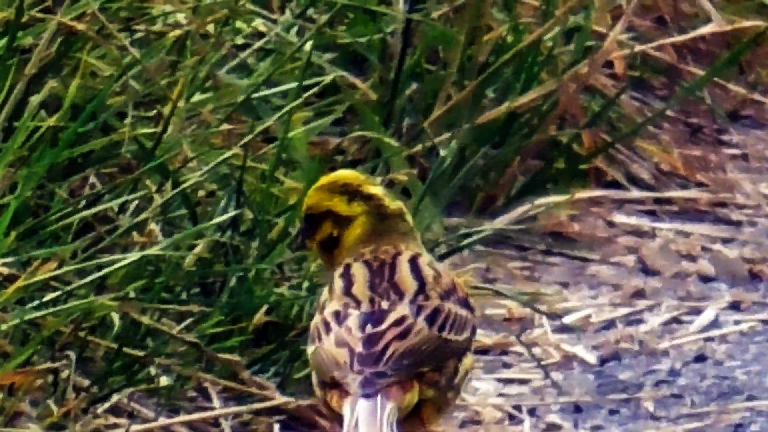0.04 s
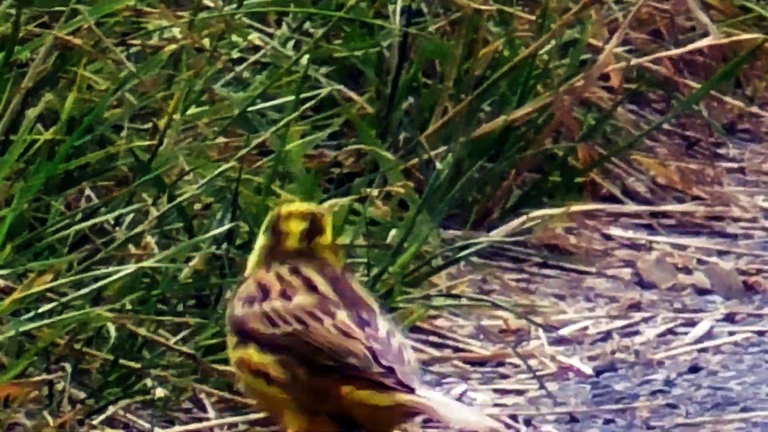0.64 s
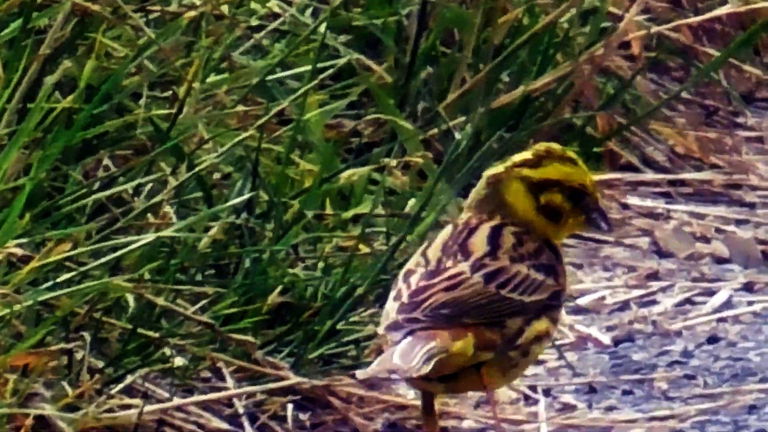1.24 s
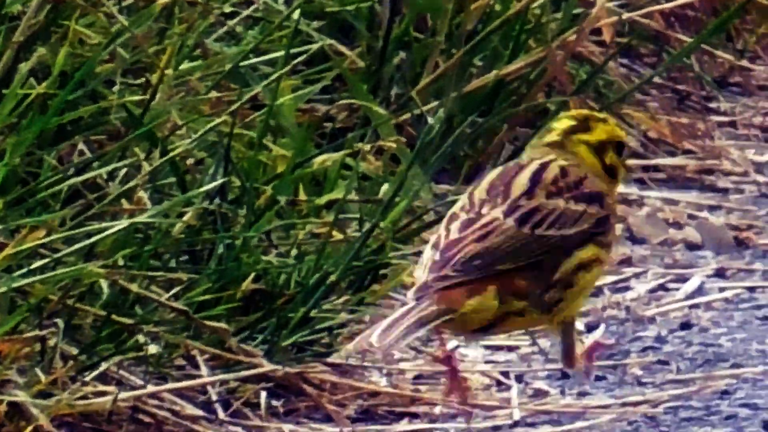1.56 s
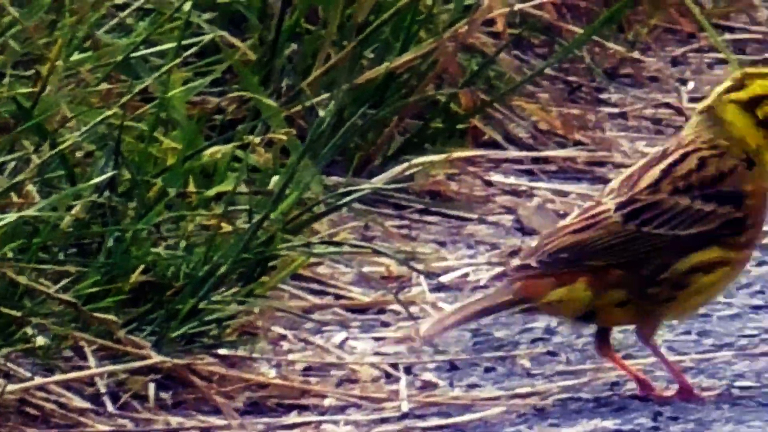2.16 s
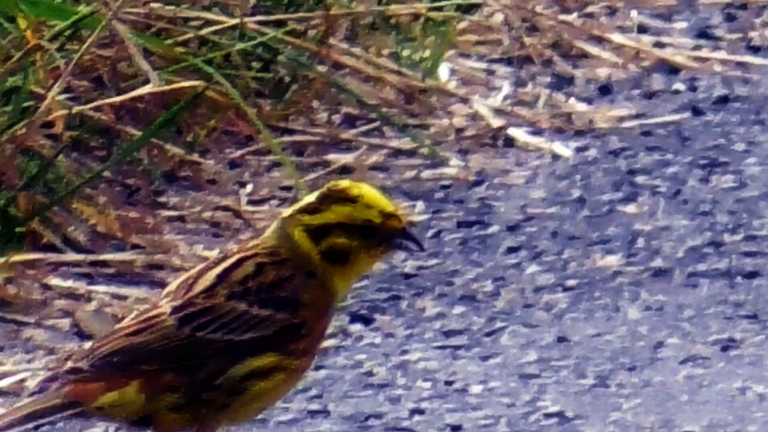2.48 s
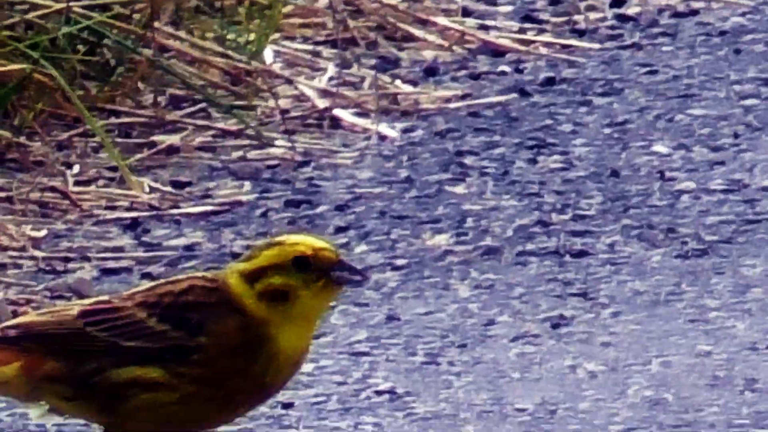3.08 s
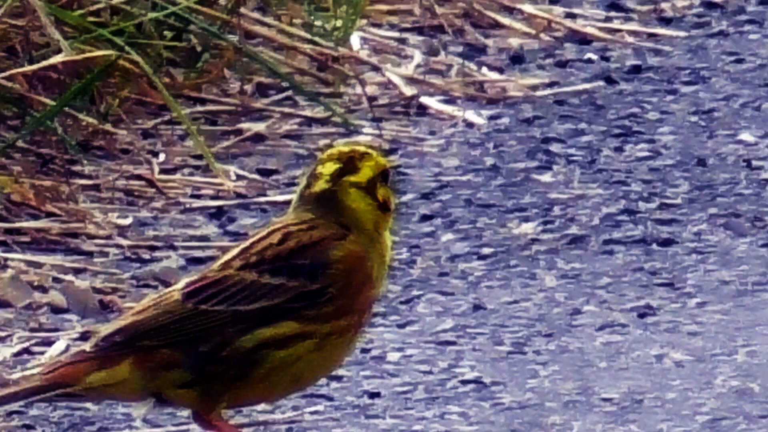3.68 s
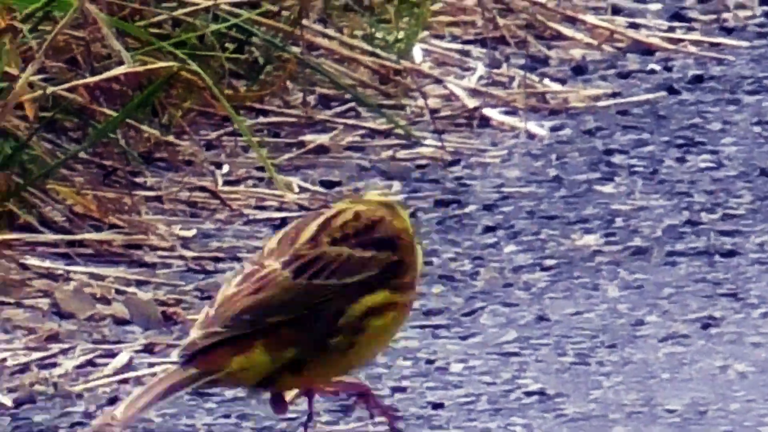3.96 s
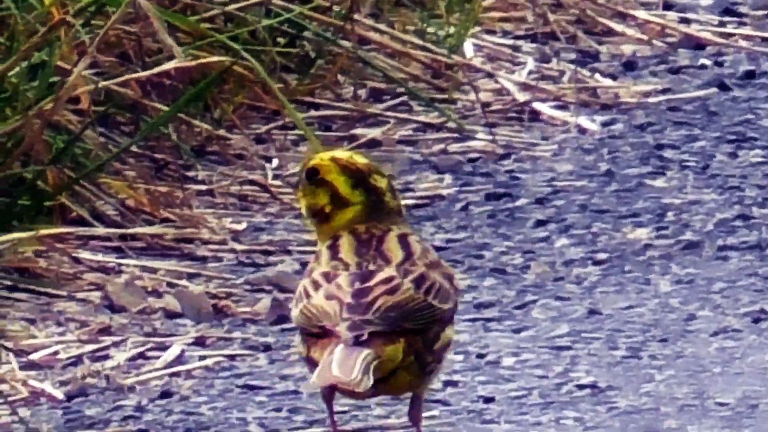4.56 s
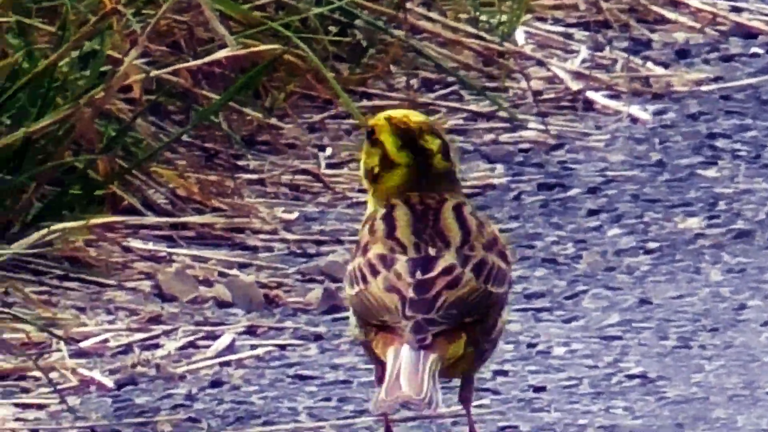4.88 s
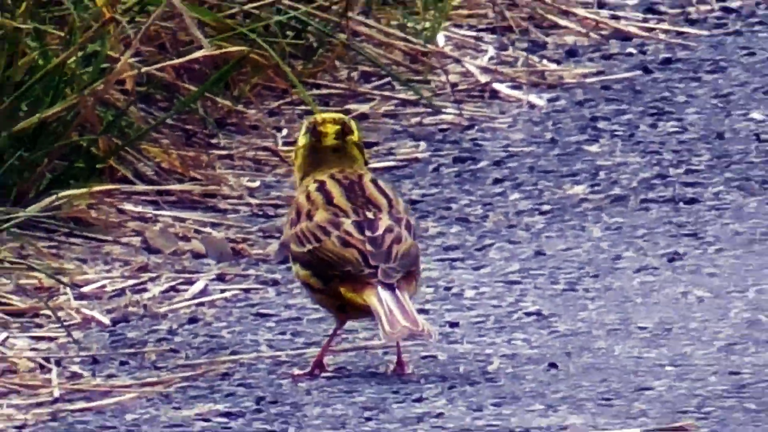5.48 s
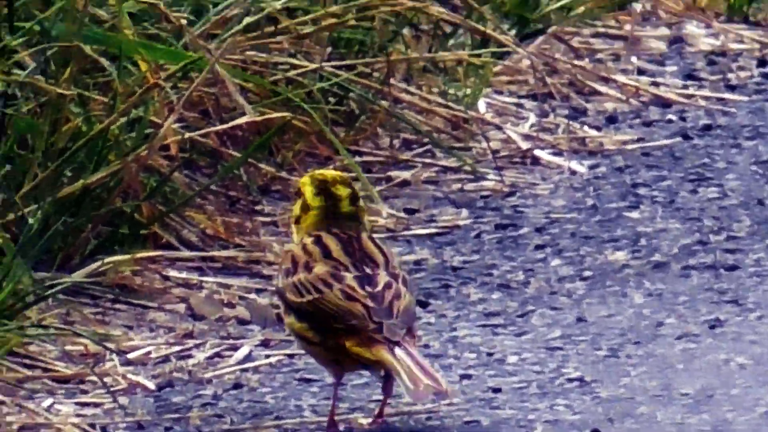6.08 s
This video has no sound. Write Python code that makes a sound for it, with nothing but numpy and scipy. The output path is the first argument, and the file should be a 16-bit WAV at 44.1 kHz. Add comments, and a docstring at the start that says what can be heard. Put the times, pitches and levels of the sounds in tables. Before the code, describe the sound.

A low outdoor rumble and the soft hiss of a distant bird chorus run throughout, about six seconds at a rural roadside. Faint far chirps come first. At 0.7 seconds a nearby songbird starts with a few soft notes, then sings loudly: a high falling slur at 1.2, quick repeated chips from 1.5 to 1.9, then a rising note, a sharp downward sweep and short whistles. Five evenly spaced rising sweeps follow from 2.5 to 3.2. Two lower whistles lead to a steep plunge at 3.5, three falling notes, a thin high whistle at 4.2 and another downward sweep. A fast dry rattle ends the song from 4.5 to 5. The notes are clear and high, each with a short fading echo. Other birds chatter quietly behind the song and keep calling until about 6 seconds. A few faint ticks and soft blips are scattered through.

```python
"""Songbird beside a country road

A songbird sings one loud phrase of slurs, sweeps and repeated notes and ends in a dry rattle.
Each note is a nearly pure tone that slides in pitch, and trees scatter it into a fading tail.
Other birds call further off, with a few faint ticks and soft blips in between. Under it all
lie a low outdoor rumble and the hiss of a distant chorus, both made of shaped noise."""
import sys
import numpy as np
from scipy import signal
from scipy.fft import rfft, irfft
from scipy.io import wavfile
from scipy.ndimage import uniform_filter1d, minimum_filter1d

SR = 44100
rng = np.random.default_rng(int(sys.argv[2]) if len(sys.argv) > 2 else 0)


def materialize(psi):
    """Save the field psi as 16-bit PCM at rate SR to the path in sys.argv[1].

    A 1-D psi becomes a single channel; in a 2-D psi each row is a channel.
    """
    bounded = np.clip(np.atleast_2d(psi).T, -1, 1)
    quanta = np.round(bounded * 32767).astype(np.int16)
    wavfile.write(sys.argv[1], SR, quanta)


N = 279594
TIME = np.arange(N) / SR

# tone colour of the rumble and of the distant chorus: f/Hz, relative level/dB
RUMBLE_COLOUR = [(15, -44), (25, -17), (37, -11), (86, 1), (114, -5.5), (145, -7), (224, -12.5), (286, -12),
                 (328, -16), (358, -14), (917, -23.5), (1210, -30), (1600, -36), (2080, -56), (3520, -120)]
CHORUS_COLOUR = [(940, -46), (1600, -8.5), (1830, -4.5), (2220, -3), (2440, -3), (2870, -3.5), (3130, -6),
                 (3440, -2), (3900, 1), (4250, 2), (4960, -4), (5780, 2), (6930, 3.5), (8080, -6.5),
                 (15800, -16.5)]
# how each of them swells and ebbs: t/s, relative level/dB
RUMBLE_SWELL = [(0.0, -33), (0.23, -34), (2.05, -30), (2.86, -34), (4.27, -28), (5.54, -33), (6.29, -27),
                (6.34, -32)]
CHORUS_SWELL = [(0, -1.8), (4.9, -1.8), (5.55, -4), (6.34, -1.5)]
# balance of the background: f/Hz, left minus right level/dB
AIR_PAN = [(60, -14), (110, -8.5), (200, -8.5), (380, -4), (700, -3.0), (1290, -1), (2380, -1.5), (4400, 0),
           (8120, 1.5), (15000, -0.5)]
# how alike its two sides are: f/Hz, likeness (0 to 1)
AIR_LIKENESS = [(30, 0.69), (70, 1), (140, 0.86), (300, 0.61), (1100, 0.67), (2200, 0.49), (3800, 0.7),
                (6600, 0.91), (8000, 0.62), (11000, 0.14)]
# how far its left side runs ahead of the right: f/Hz, phase/rad
AIR_PHASE = [(30, 3.5), (70, 2), (300, 2.1), (600, 1.93), (1100, 1.7), (2200, 0.95), (4000, -0.46),
             (12000, 0)]

# note shapes by name: length/s, start f/Hz, end f/Hz, glide/s, fade-in/s, fade-out/s, level change/dB
SYLLABLES = { "slur": (.155, 9000, 6490, .097, .055, .022, -8),
             "chip": (.048, 7200, 5380, .026, .011, .008, -4),
             "tip": (.032, 5820, 4560, .046, .009, .01, -1), "pip": (.011, 5400, 6350, .012, .006, .004, 0),
             "rise": (.12, 6680, 7880, .105, .014, .02, -7),
             "chew": (.069, 6950, 3800, .064, .008, .014, -5),
             "chow": (.074, 6500, 3620, .075, .009, .016, -8),
             "whistle": (.055, 4930, 4785, .022, .021, .03, -2),
             "see": (.092, 6500, 6740, .04, .009, .015, 1), "drop": (.016, 6750, 5800, .026, .005, .005, 0),
             "sweep": (.098, 4660, 6200, .103, .016, .042, 9),
             "flute": (.092, 4200, 3975, .045, .025, .026, 0),
             "dip": (.066, 5150, 4550, .036, .02, .02, -1),
             "plunge": (.156, 8400, 5520, .055, .04, .02, -10),
             "tew": (.076, 5380, 3590, .103, .008, .011, -10),
             "thin": (.185, 7600, 7170, .38, .046, .025, -3),
             "sue": (.06, 7100, 6250, .075, .008, .014, -3), "wit": (.028, 3400, 4300, .04, .01, .008, 0),
             "arch": (.085, 7730, 8150, .055, .02, .015, 0),
             "lift": (.055, 4870, 5060, .055, .015, .012, -2),
             "click": (.0058, 7700, 4400, .008, .0022, .0025, 0),
             "flick": (.01, 5500, 7900, .016, .002, .006, -4), }
# some syllables slide into their start pitch first: length/s, from f/Hz
LEAD_INS = {"chip": (.01, 4600), "rise": (.015, 7200), "chew": (.011, 4400), "chow": (.011, 4200),
            "see": (.015, 7350), "plunge": (.024, 8050), "thin": (.028, 6750)}
# single notes of the far birds and of the near singer: t/s, syllable, level/dB, pitch ratio
NEIGHBOUR_NOTES = [ (.04, "flute", -41, 1.09), (.05, "flute", -46, .79), (.11, "flute", -41, 1.09),
                   (.562, "tip", -38, .98), (.96, "arch", -43, .9), (1, "tip", -42, .6),
                   (1.36, "wit", -33, 1), (1.65, "wit", -39, 1), (2.318, "tip", -37, .62),
                   (2.6, "flute", -39, .87), (2.74, "flute", -41, .775), (2.9, "flute", -37, .91),
                   (3.395, "sue", -34, 1.13), (3.455, "wit", -37, .87), (3.655, "lift", -40, .595),
                   (3.91, "sue", -40, .44), (4.315, "sue", -27, .98), (4.318, "sue", -40, .445),
                   (4.533, "sue", -27, 1), (4.756, "whistle", -33, .93), (5.205, "flute", -40, 1.05),
                   (5.28, "lift", -41, .84), (5.345, "lift", -43, .86), (5.792, "pip", -42, .37),
                   (5.82, "wit", -43, .98), (5.855, "lift", -43, .85)]
SONG_NOTES = [ (.746, "tip", -25, 1.015), (.892, "lift", -24, 1), (1.078, "lift", -30, .885),
              (1.156, "slur", -15.5, 1), (1.416, "chip", -15, .985), (1.907, "rise", -12.5, 1),
              (2.048, "chew", -10.5, 1), (2.226, "whistle", -13, 1), (2.38, "see", -16.5, 1),
              (2.468, "drop", -13.5, 1), (3.288, "flute", -17.5, 1), (3.435, "dip", -16, 1),
              (3.548, "plunge", -11, 1), (4.186, "thin", -14.5, 1), (4.411, "chow", -12, 1)]
# their repeated notes: first t/s, last t/s, spacing/s, syllable,
# first level/dB, last level/dB, first pitch ratio, last pitch ratio
NEIGHBOUR_RUNS = [ (.15, .44, .097, "sue", -42, -39, .96, .87),
                  (.95, 1.49, .27, "flute", -47, -46, .66, .67),
                  (2.6, 3.46, .143, "arch", -39.5, -33, .945, 1.013),
                  (2.795, 2.897, .102, "sue", -29, -29.5, 1.01, 1.01),
                  (5.145, 5.353, .104, "sue", -32, -29, 1, 1),
                  (5.47, 5.65, .18, "arch", -42, -44, .92, .91)]
SONG_RUNS = [ (1.507, 1.831, .081, "tip", -20, -15, .995, .985),
             (1.569, 1.81, .08, "pip", -29, -24, .98, .99),
             (2.517, 3.122, .1513, "sweep", -16, -16.5, 1, .995),
             (3.721, 4.059, .169, "tew", -13.5, -14, 1, .995),
             (3.83, 3.999, .169, "pip", -18.5, -16.5, .99, .99)]
# faint dry ticks: t/s, level/dB before filtering
TICKS = [(.427, -24), (2.363, -27), (4.612, -29), (5.376, -29), (5.4, -26), (6.05, -31)]
# short soft blips: t/s, level/dB
BLIPS = [(1.19, -32.5), (1.362, -36), (2, -27.5), (2.94, -32.5), (3.425, -39), (4.232, -32.5),
         (5.444, -31.5)]


def undb(db):
    """Turn decibels into a factor to multiply by."""
    return 10 ** (np.asarray(db) / 20)


def curve(rows):
    """Join rows of (t/s, value) with straight lines."""
    return np.interp(TIME, *np.transpose(rows))


def over_hz(rows):
    """Spread rows of (f/Hz, value) over all frequencies, giving each octave equal room."""
    hz, value = np.transpose(rows)
    return np.interp(np.log(np.maximum(np.fft.rfftfreq(N, 1 / SR), 1)), np.log(hz), value)


def wander(rate_hz, size):
    """A random line, mostly within -1 to 1, that turns rate_hz times a second."""
    position = np.arange(size) * rate_hz / SR
    turns = int(position[-1]) + 2
    return np.interp(position, np.arange(turns), rng.standard_normal(turns))


def add(track, start_s, sound):
    """Mix a sound into a track at the given time."""
    i = max(int(start_s * SR), 0)
    track[i:i + len(sound)] += sound[:max(N - i, 0)]


def outdoors(colour, db, swell_db, swell_band_hz):
    """Far noise from all around, partly alike left and right; one band of it swells and ebbs."""
    shared, own = rfft(rng.standard_normal((2, N)))
    likeness = np.clip(over_hz(AIR_LIKENESS), 0, 1)
    hz, radians = np.transpose(AIR_PHASE)
    lead = np.exp(1j * over_hz(np.transpose([hz, np.unwrap(radians)])))
    pan = undb(over_hz(AIR_PAN))
    left = pan * (likeness * lead * shared + np.sqrt(1 - likeness ** 2) * own)
    # dividing by this gives the sum of both sides the wanted colour
    sum_gain = np.sqrt(1 + pan ** 2 + 2 * pan * likeness * lead.real)
    pair = irfft(np.array([left, shared]) * undb(over_hz(colour)) / sum_gain, N)
    pair *= undb(db) / pair.mean(axis=0).std()
    band = signal.sosfiltfilt(signal.butter(2, swell_band_hz, "band", fs=SR, output="sos"), pair)
    return pair + band * (undb(swell_db) - 1)


def rumble():
    """Low outdoor noise whose bass slowly rises and falls."""
    swell_db = curve(RUMBLE_SWELL)
    return outdoors(RUMBLE_COLOUR, db=-29.8, swell_db=swell_db - swell_db.mean(), swell_band_hz=(30, 180))


def chorus():
    """A distant chorus blurred into a soft hiss whose treble flickers."""
    swell_db = curve(CHORUS_SWELL) + 1.2 * wander(14, N)
    return outdoors(CHORUS_COLOUR, db=-37.5, swell_db=swell_db, swell_band_hz=(3000, 11200))


def bird_note(shape, ratio, waver, lead_in=None, flutter_db=3.3):
    """A bird's voice box makes one nearly pure tone; waver shakes its pitch and flutter its level."""
    length, start_hz, end_hz, glide, fade_in, fade_out, change_db = shape
    lead_s, lead_hz = lead_in or (0, start_hz)
    t = np.arange(int(length * SR)) / SR
    glide_left = np.clip(1 - (t - lead_s) / glide, 0, 1) ** 2.2  # the glide slows towards its end
    hz = end_hz + (start_hz - end_hz) * glide_left
    if lead_in:
        hz += (lead_hz - start_hz) * np.maximum(1 - t / lead_s, 0)
    hz *= ratio * (1 + waver * wander(302, len(t)))
    phase = 2 * np.pi * np.cumsum(hz) / SR
    push = undb(change_db * t / length + flutter_db * wander(185.5, len(t)))
    opening = np.minimum(t / fade_in, 1) * np.minimum((length - t) / fade_out, 1)
    push *= np.sin(np.pi / 2 * opening) ** 2
    # a faint raspy octave comes out when the bird pushes hardest
    overtone = undb(-39) * push * wander(1490, len(t)) * np.sin(2 * phase)
    return np.sqrt(2) * push * (np.sin(phase) + overtone)


def repeat(runs):
    """Turn runs into notes: a syllable repeats evenly while its level and pitch drift."""
    notes = []
    for first, last, spacing, name, first_db, last_db, first_ratio, last_ratio in runs:
        count = round((last - first) / spacing) + 1
        steps = np.linspace((first, first_db, first_ratio), (last, last_db, last_ratio), count)
        notes += [(s, name, db, ratio) for s, db, ratio in steps]
    return notes


def sing(notes, waver, flutter_db=2.9):
    """Sing each note at its own time, level and pitch."""
    out = np.zeros(N)
    for start, name, db, ratio in notes:
        add(out, start, undb(db) * bird_note(SYLLABLES[name], ratio, waver, LEAD_INS.get(name), flutter_db))
    return out


def trees(sound, near_db, far_db, left_db):
    """Near branches scatter a sound into a quick, dense tail; far trees answer for longer."""
    t = np.arange(int(1.5 * SR)) / SR
    build_up = 1 - np.exp(-t / .0084)
    echoes = np.zeros((2, len(t)))
    echoes[:, 0] = 1  # the sound that arrives directly
    for db, fade_s, width in (near_db, .28, .5), (far_db, 1.24, .4):
        decay = undb(-60 * t / fade_s) * build_up
        mid, side = rng.standard_normal((2, len(t))) * decay / np.linalg.norm(decay)
        echoes += undb(db) * np.array([mid + width * side, mid - width * side])
    balance = undb([[left_db / 2], [-left_db / 2]])
    return signal.fftconvolve(sound[None], echoes, axes=1)[:, :N] * balance


def neighbours():
    """Birds further off call softly through the trees."""
    calls = sing(NEIGHBOUR_NOTES + repeat(NEIGHBOUR_RUNS), waver=.009)
    return trees(calls, near_db=-3, far_db=-4.5, left_db=0)


def ticks(decay_s=.003, band_hz=(6000, 12000)):
    """Tiny dry cracks: bursts of bright noise that die at once."""
    out = np.zeros(N)
    t = np.arange(SR // 40) / SR
    for start, db in TICKS:
        add(out, start, undb(db) * np.exp(-t / decay_s) * rng.standard_normal(len(t)))
    return signal.sosfilt(signal.butter(1, band_hz, "band", fs=SR, output="sos"), out)


def singer():
    """The near bird sings its loud phrase, well above its own echoes."""
    phrase = sing(SONG_NOTES + repeat(SONG_RUNS), waver=.006)
    return trees(phrase, near_db=-5.2, far_db=-11.5, left_db=-.8)


def blips(hz=950, width_s=.003):
    """Soft rounded tones, each only a few waves long."""
    loudness = sum(undb(db) * np.exp(-((TIME - s) / width_s) ** 2 / 2) for s, db in BLIPS)
    return np.sqrt(2) * loudness * np.sin(2 * np.pi * hz * TIME)


def chatter(count=75, slide=.13):
    """Far birds chatter in short, steep slides up and down, lower than the singer."""
    out = np.zeros(N)
    for _ in range(count):
        start, length = rng.uniform(1.25, 4.5), rng.uniform(.022, .06)
        hz, db = rng.uniform(2200, 3900), rng.uniform(-54.5, -47.5)
        bend_hz = hz * slide * rng.choice([-1, 1])
        shape = (length, hz - bend_hz, hz + bend_hz / 2, length, length / 2, length / 2, 0)
        add(out, start, undb(db) * bird_note(shape, ratio=1, waver=.022))
    return trees(out, near_db=-.5, far_db=2, left_db=4)


def rattle(start_s=4.518, end_s=4.968, spacing_s=.03, first_db=-20.7, last_db=-22.2):
    """The singer ends on very fast downward strokes, each followed by a weaker upward flick."""
    strokes = repeat([(start_s, end_s, spacing_s, "click", first_db, last_db, 1, 1)])
    down = [(s, name, db + .8 * rng.standard_normal(), ratio) for s, name, db, ratio in strokes]
    up = [(s + .014, "flick", db - 7, ratio) for s, _, db, ratio in down]
    return trees(sing(down + up, waver=.035, flutter_db=1), near_db=-1.5, far_db=-6.5, left_db=-.8)


def scene():
    """Add up the background, the birds and the small sounds, in stereo."""
    return rumble() + chorus() + neighbours() + ticks() + singer() + blips() + chatter() + rattle()


def record(dry, ceiling=.56, window_samples=5, top_hz=15900):
    """A fast limiter holds loud notes down, the input distorts them slightly, and the top is cut."""
    needed_gain = ceiling / np.maximum(np.abs(dry).max(axis=0), ceiling)
    smooth_gain = uniform_filter1d(minimum_filter1d(needed_gain, window_samples), window_samples)
    held = dry * smooth_gain
    distorted = held + .015 * held ** 2 - .09 * held ** 3
    return signal.sosfilt(signal.ellip(10, .2, 80, top_hz, fs=SR, output="sos"), distorted)


dry = scene()
out = record(dry)
materialize(out)
```